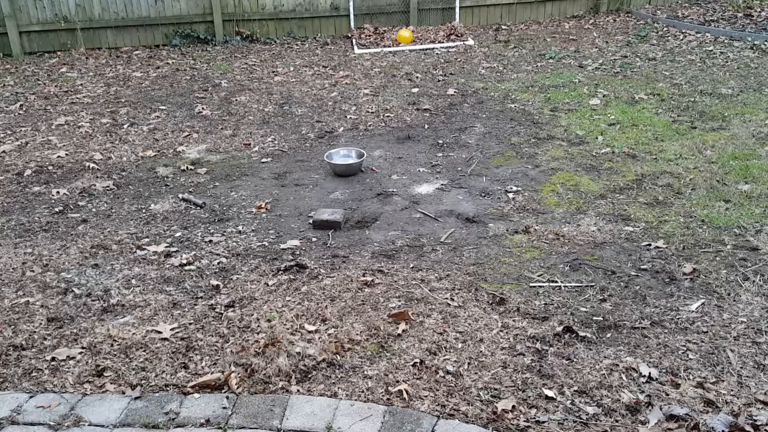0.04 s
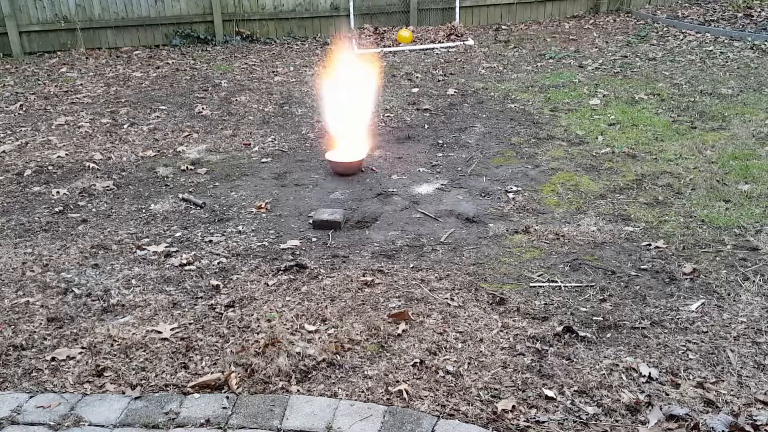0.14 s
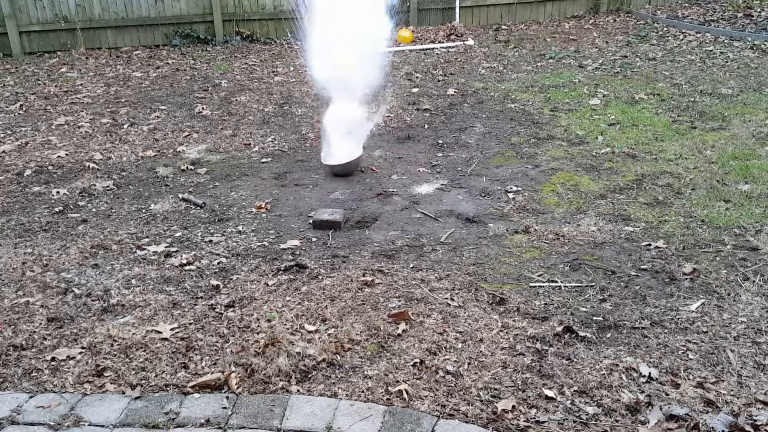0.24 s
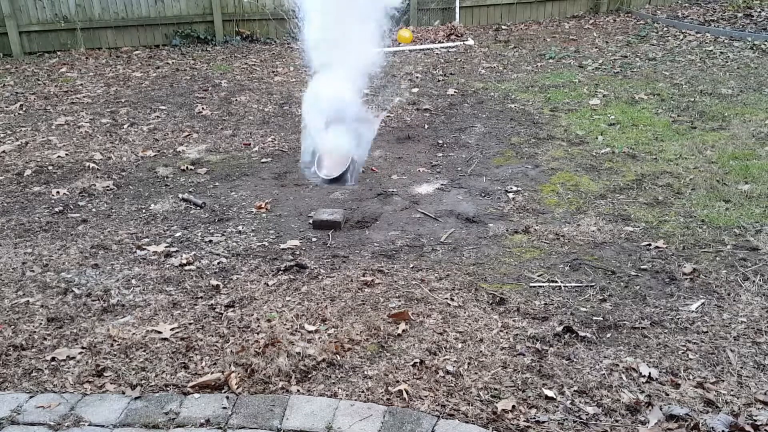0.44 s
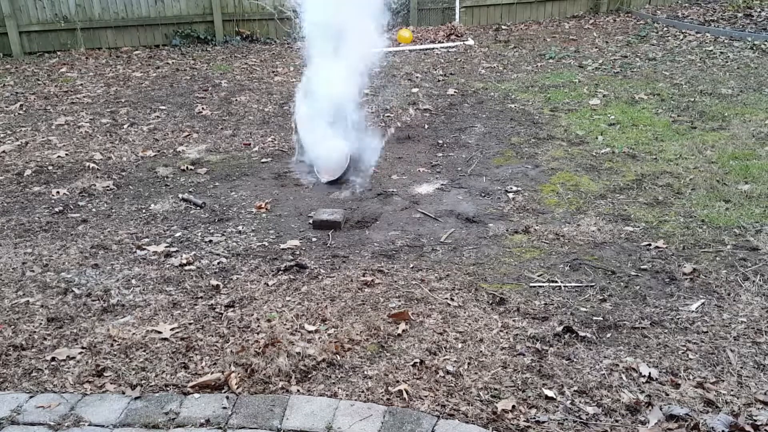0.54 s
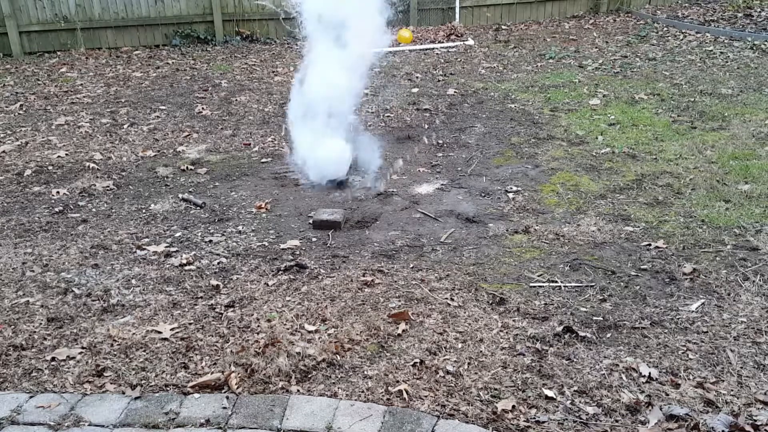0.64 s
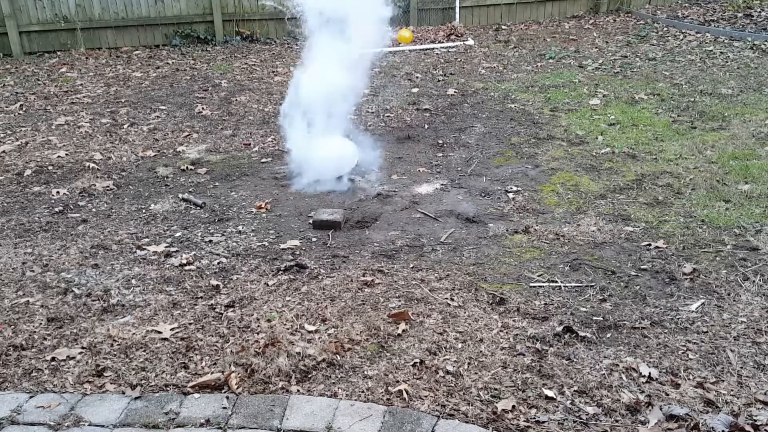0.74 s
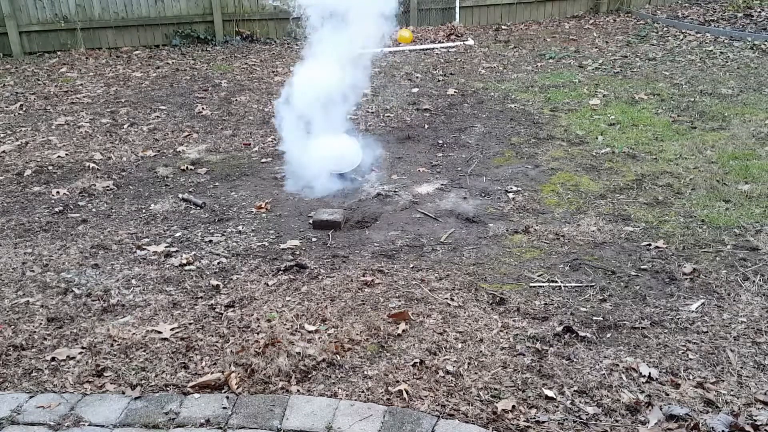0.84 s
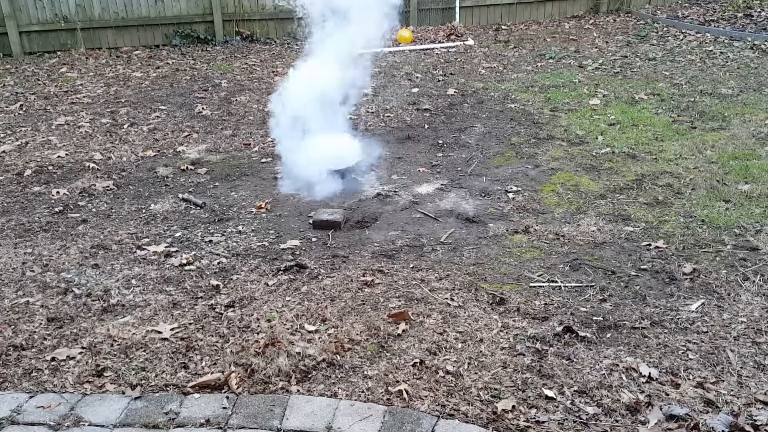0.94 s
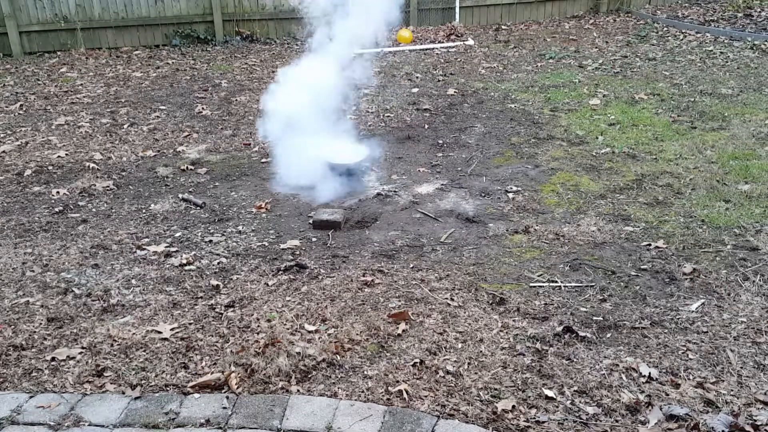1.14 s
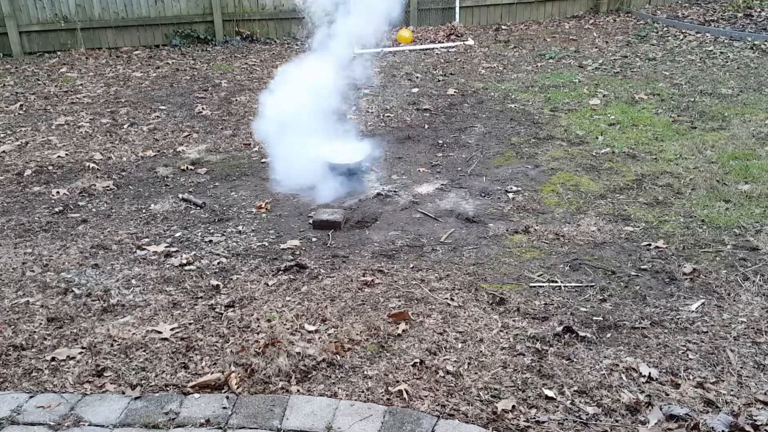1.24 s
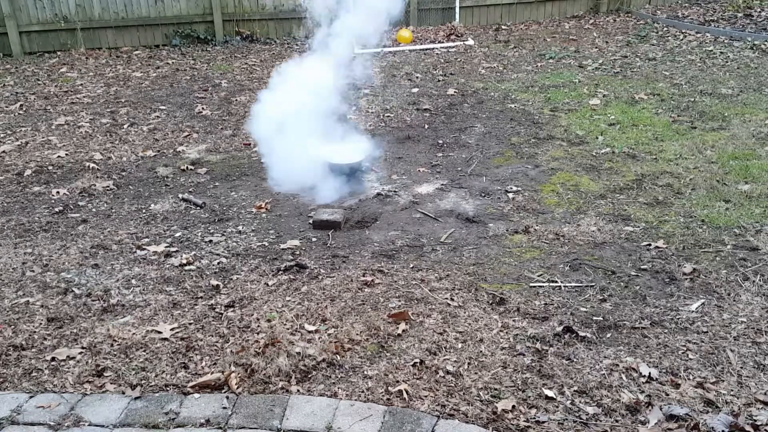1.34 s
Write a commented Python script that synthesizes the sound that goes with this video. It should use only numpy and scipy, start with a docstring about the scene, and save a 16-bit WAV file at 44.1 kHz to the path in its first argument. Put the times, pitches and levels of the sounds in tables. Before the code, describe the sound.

A sharp, loud bang bursts out of quiet outdoor air at about 0.2 seconds, slightly distorted, as metal explodes in a bowl of water. The steel bowl rings briefly and quick echoes die away by about 1 second. A faint, dull seething builds underneath. From around 0.6 seconds until the end near 1.4, droplets patter softly on dead leaves with scattered small pops and sizzles.

```python
"""A sharp bang: sodium explodes in a steel bowl of water in a fenced back yard, a few metres away.
The blast overloads the microphones, sets the bowl ringing, slaps back from fences and walls and
dies away among the trees. The rest of the metal seethes in the bowl while thrown drops patter
and spit on dead leaves, over quiet outdoor air."""
import sys
import numpy as np
from scipy import signal
from scipy.fft import rfft, irfft
from scipy.io import wavfile

SR = 44100
rng = np.random.default_rng(int(sys.argv[2]) if len(sys.argv) > 2 else 0)


def digitize_waveform(pressure):
    """Quantize a signal to 16-bit integers and store it at the path in sys.argv[1].

    Rows of a 2-D input are taken as channels; values are limited to [-1, 1].
    """
    field = np.atleast_2d(pressure).T
    bounded = np.clip(field, -1, 1)
    quanta = np.round(bounded * 32767).astype(np.int16)
    wavfile.write(sys.argv[1], SR, quanta)


N = 61739
T, HZ = np.arange(N) / SR, np.maximum(np.fft.rfftfreq(N, 1 / SR), 1)
BANG_S, TOP_HZ = 0.2226, 15900
BASS_ROLLOFF = np.minimum(HZ / 1500, 1)


def undb(db):
    """dB to gain."""
    return 10 ** (np.asarray(db) / 20)


def unit(x):
    """Scale to rms 1."""
    return x / np.sqrt(np.mean(x ** 2))


def curve(points, hz=HZ):
    """Interpolate (f/Hz, value) points over log frequency."""
    f, v = np.array(points, float).T
    return np.interp(np.log(hz), np.log(f), v)


def hump(hz, width_oct):
    """Gaussian band over log frequency."""
    return np.exp(-.5 * (np.log2(HZ / hz) / width_oct) ** 2)


def noise(colour, width=None):
    """Stereo noise, rms 1, of given colour and width."""
    # unlikeness of the two microphones: f/Hz, side minus mid/dB
    mic_width = [(60, -16), (200, -21), (380, -11), (700, -2.5), (1290, 0.5), (2400, -1), (4400, -1),
                 (15000, 2)]
    side_gain = undb(curve(mic_width if width is None else width))
    mid, side = rfft(rng.standard_normal((2, N)))
    left_right = mid + np.array([[1], [-1]]) * side_gain * side
    return unit(irfft(colour * left_right / np.hypot(1, side_gain), N))


def fade(start_s, t60_s):
    """Zero until the start, then exponential decay."""
    return (T >= start_s) * np.exp(-np.log(1000) * np.maximum(T - start_s, 0) / t60_s)


def rise(start_s, length_s):
    """Ramp from 0 to 1."""
    return np.clip((T - start_s) / length_s, 0, 1)


def swell(centre_s, width_s):
    """Gaussian envelope, zero before the bang."""
    return np.exp(-.5 * ((T - centre_s) / width_s) ** 2) * rise(BANG_S, 0.0027)


def flicker(rate_hz):
    """Random wander, spread near 1."""
    return np.interp(T * rate_hz, np.arange(N), rng.standard_normal(N))


def air():
    """Quiet, steady outdoor air."""
    # background spectrum: f/Hz, level/dB
    spectrum = [(30, -6.5), (50, 2.5), (126, -3.5), (208, -7.5), (350, -7), (800, -11.5), (1900, -18),
                (2620, -13.5), (3400, -18.5), (6000, -22), (8300, -16.5), (9900, -25.5), (15500, -21.5)]
    return undb(-61.5) * noise(undb(curve(spectrum)))


def explosion():
    """Shock crack, pressure punch right behind it, roar of bursting gas and low fireball thump."""
    # roar spectrum: f/Hz, level/dB
    spectrum = [(30, -32.5), (80, -28), (200, -12), (500, -2.5), (1200, 0), (2100, -0.5), (3000, -9.5),
                (4300, -5.5), (5500, -21.5), (8000, -14.5), (15000, -20)]
    # stereo width of the blast: f/Hz, side minus mid/dB
    width = [(60, -6), (200, 0.5), (500, 1.5), (1200, 0), (2200, 2), (4400, 2), (15000, -0.5)]
    sag_s, sag_db_per_s, punch_delay_s = .028, 171.5, 0.00029
    crack = undb(-1.5) * noise(hump(6435, 0.57)) * fade(BANG_S, t60_s=0.031)
    punch = undb(8) * noise(hump(1900, 0.49)) * fade(BANG_S + punch_delay_s, t60_s=0.036)
    thump = undb(-22) * noise(hump(157, .85), width) * swell(centre_s=0.259, width_s=.013)
    sag = undb(-sag_db_per_s * np.clip(T - BANG_S, 0, sag_s))
    release_s = BANG_S + sag_s
    release = (T < release_s) + fade(release_s, t60_s=.11)
    envelope = rise(BANG_S, 0.0045) ** 2 * sag * release
    roar = undb(-2) * noise(undb(curve(spectrum)), width) * envelope
    return crack + punch + roar + thump


def bowl():
    """The kicked bowl rings briefly, wavering as the water leaves it."""
    # bowl modes: f/Hz, level/dB, t60/s
    modes = [(387.6, -6, .5), (452.4, -2.5, 0.75), (534, -4, .45), (590.4, -4, .3), (737, -3.5, 0.39),
             (1056, -4.5, .55), (1335, 0.5, 0.581), (1553, -10.5, .4), (2180, -9, .5), (3780, -14.5, .3)]
    ring = 0
    for hz, db, t60_s in modes:
        phase = 2 * np.pi * np.cumsum(hz * (1 + 0.012 * flicker(60))) / SR
        mic_phase = rng.standard_normal((2, 1)) * min(hz / 1000, 2)
        ring = ring + undb(db) * np.sin(phase + mic_phase) * fade(BANG_S, t60_s)
    return undb(-18) * ring


def yard():
    """Countless uneven reflections; air absorbs the treble first, lows return late from far houses."""
    # scatter spectrum: f/Hz, level/dB
    spectrum = [(40, -55.5), (90, -41.5), (143, -20), (287, -10), (430, -9.5), (686, -2.5), (800, -9),
                (1100, -10.5), (1500, -12), (2160, -13), (3000, -21.5), (5000, -27.5), (8100, -28),
                (15500, -35)]
    # scatter decay: f/Hz, t60/s
    decay = [(60, 0.45), (170, 0.99), (500, 0.62), (1200, 0.92), (2500, 0.79), (5000, 0.83), (8500, 0.55),
             (14000, 0.7)]
    ripple_step_hz = 21.5
    loss_hz, loss_s = 9900, .27  # air absorption reaches 1/e at this frequency and age
    ripple_db = 2 * np.interp(HZ / ripple_step_hz, np.arange(N), rng.standard_normal(N)) * BASS_ROLLOFF
    colour = undb(curve(spectrum) + ripple_db)
    scatter = rfft(noise(colour) * undb(flicker(200)))
    centres_hz = np.geomspace(40, 16000, num=14)
    tail = 0
    for hz, pick in zip(centres_hz, np.eye(len(centres_hz))):
        band = irfft(scatter * np.interp(np.log(HZ), np.log(centres_hz), pick), N)
        absorption = np.exp(-(hz / loss_hz * (T - BANG_S) / loss_s) ** 2)
        tail = tail + band * fade(BANG_S, curve(decay, hz)) * absorption
    rumble = undb(-40) * noise(hump(207, 1.0)) * swell(centre_s=0.46, width_s=0.097)
    return undb(-7.5) * tail * rise(BANG_S, 0.013) + rumble


def echoes():
    """Each fence or wall returns the bang as a short, smeared band of noise."""
    # reflections: t/s, level/dB, f/Hz, width/oct, t60/s
    slaps = [(0.239, -10.5, 3500, 0.69, .09), (0.246, -8.5, 516, 0.27, .04), (0.257, 2.5, 702, 0.43, 0.035),
             (0.264, 0, 345, 0.45, 0.018), (0.283, -12, 477, .5, 0.11), (0.296, -7.5, 575, 0.49, 0.074),
             (0.303, -11, 594, 0.18, 0.097), (0.310, -15, 1200, .9, 0.063),
             (0.326, -13.5, 610, 0.43, 0.062), (0.333, -14, 680, 0.42, 0.023),
             (0.378, -21.5, 1020, 0.98, 0.24), (0.448, -21, 660, 0.46, 0.1), (0.546, -34, 400, 0.99, .12)]
    return sum(undb(db) * noise(hump(hz, width_oct)) * fade(at_s, t60_s) * rise(at_s, .001)
               for at_s, db, hz, width_oct, t60_s in slaps)


def seething():
    """The reaction boils on as a dull, slowly growing rush."""
    # boiling spectrum: f/Hz, level/dB
    spectrum = [(35, -37.5), (60, -10), (123, -1.5), (150, -14), (292, -8), (445, -5), (702, -0.5),
                (837, -7.5), (1030, -4), (4000, -24), (5200, -49), (8800, -120)]
    growth_db_per_s, lowpass_hz = 0.5, 3500
    level_db = -49.5 + growth_db_per_s * (T - 1) + 0.58 * flicker(40.1)
    colour = undb(curve(spectrum)) / np.hypot(1, (HZ / lowpass_hz) ** 3)
    return noise(colour) * undb(level_db) * rise(start_s=0.32, length_s=.3)


def patter():
    """Fine droplets rain back on the leaves as dense, tiny clicks."""
    # droplet envelope: t/s, level/dB
    levels = [(0.6, -84), (0.725, -71), (0.752, -58), (0.81, -61), (0.85, -87), (1.04, -82), (1.14, -64),
              (1.25, -62.5), (1.4, -63.5)]
    # click spectrum: f/Hz, level/dB
    spectrum = [(1500, -10), (4000, -4.5), (8000, -1.5), (10000, -3.5), (15000, -7)]
    drops_per_s, spread_db = 4000, 3.5
    hits = rng.random(N) < drops_per_s / SR
    clicks = hits * undb(spread_db * rng.standard_normal(N)) * rng.standard_normal((2, N))
    colour = undb(curve(spectrum)) * BASS_ROLLOFF
    envelope = undb(np.interp(T, *np.array(levels).T))
    return unit(irfft(rfft(clicks) * colour, N)) * envelope


def pops():
    """Larger drops snap as they land, each followed by a grainy sizzle."""
    # landings: t/s, snap level/dB, tilt above 4 kHz/(dB/oct), sizzle level/dB
    drops = [(0.602, -58, 4, -80), (0.7773, -42.5, -4, -52), (0.918, -54.5, 0, -73), (0.979, -52, 8, -83),
             (0.998, -58, -7, -74), (1.0618, -46.5, -4, -53.5), (1.08, -56.5, -5, -75),
             (1.163, -48, -3, -64), (1.2235, -50, 6, -58), (1.277, -50, 1, -77), (1.312, -53, 3, -77),
             (1.3773, -50, 11, -70)]
    # snap spectrum: f/Hz, level/dB
    snap_spectrum = [(1500, -20), (3500, 2), (5000, 2), (8000, 7), (15000, 1)]
    # sizzle spectrum: f/Hz, level/dB
    sizzle_spectrum = [(1500, -8), (3000, -4), (4800, 2.5), (8000, -4), (10000, -11), (15000, -4)]
    treble_oct = np.log2(np.maximum(HZ, 4000) / 4000)
    snaps, sizzle_envelope = 0, 0
    for at_s, snap_db, tilt_db_per_oct, sizzle_db in drops:
        colour = undb(curve(snap_spectrum) + tilt_db_per_oct * treble_oct) * BASS_ROLLOFF * (HZ < TOP_HZ)
        snaps = snaps + noise(colour) * undb(snap_db) * fade(at_s, t60_s=.011)
        sizzle_envelope = sizzle_envelope + undb(sizzle_db) * fade(at_s, t60_s=0.29)
    hiss = noise(undb(curve(sizzle_spectrum)) * BASS_ROLLOFF)
    grain = undb(3.5 * flicker(320))
    return snaps + sizzle_envelope * hiss * grain


def gain_control(x):
    """Quiet sound is lifted; the lift is withdrawn as a slowly falling peak meter passes the knee."""
    lift_db, knee_db, recovery_db_per_s = 5.5, -43.5, 26
    peak_db = 20 * np.log10(np.abs(x).max(axis=0) + 1e-9)
    fall_db = recovery_db_per_s * T
    held_db = np.maximum.accumulate(peak_db + fall_db) - fall_db
    return x * undb(np.clip(lift_db - (held_db - knee_db) / 2, 0, lift_db))


def scene():
    """The bang, then its aftermath; aftermath and air lean slightly left."""
    left_over_right_db = 1.1
    lean = undb(np.array([[.5], [-.5]]) * left_over_right_db)
    background = air()
    bang = explosion() + echoes() + bowl()
    aftermath = yard() + seething() + pops() + patter()
    return bang + (aftermath + background) * lean


def record(dry):
    """Microphones dull the top octave; the blast ducks the gain and clips; both band edges are cut."""
    shelf_hz, shelf_db, ceiling, low_cut_hz = 8830, -7, .96, 61
    shelf = np.clip((HZ - shelf_hz) / 500 + .5, 0, 1)
    dulled = irfft(rfft(dry) * undb(shelf_db * shelf), N)
    ducked = gain_control(dulled)
    clipped = ducked / (1 + (ducked / ceiling) ** 8) ** (1 / 8)
    thinned = signal.sosfilt(signal.butter(2, low_cut_hz, "high", fs=SR, output="sos"), clipped)
    return signal.sosfilt(signal.ellip(8, .2, 70, TOP_HZ, fs=SR, output="sos"), thinned)


dry = scene()
out = record(dry)
digitize_waveform(out)
```